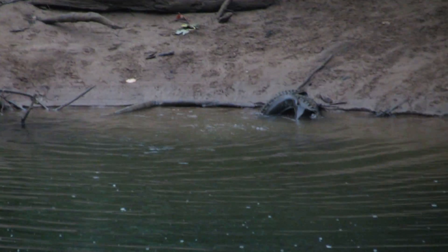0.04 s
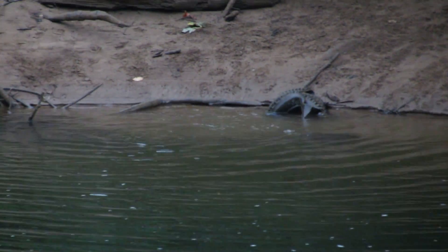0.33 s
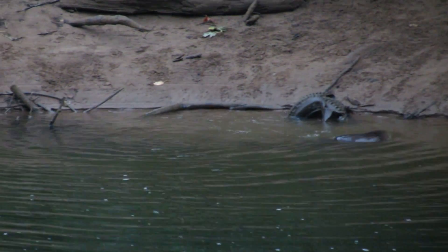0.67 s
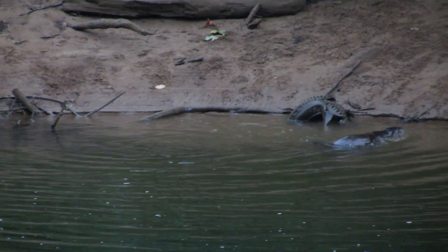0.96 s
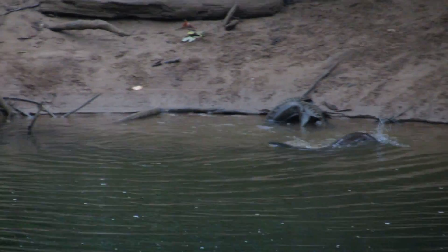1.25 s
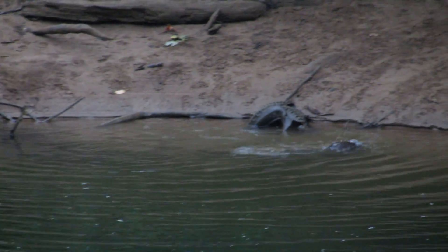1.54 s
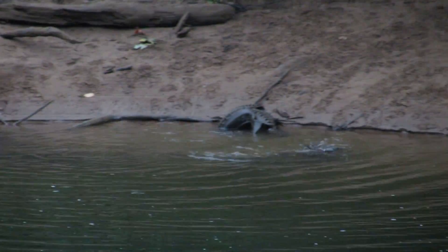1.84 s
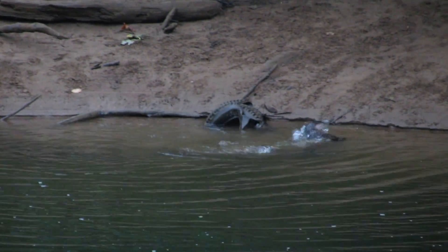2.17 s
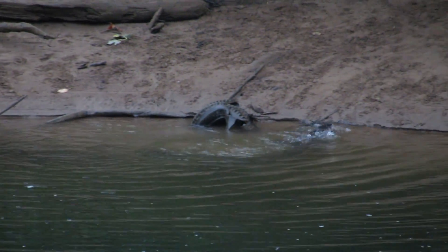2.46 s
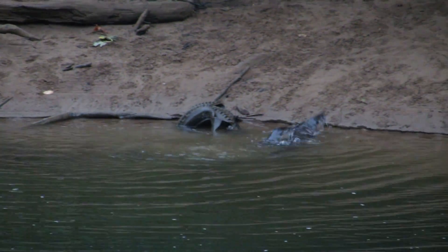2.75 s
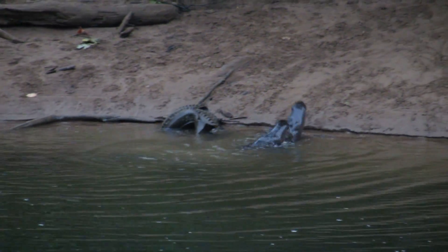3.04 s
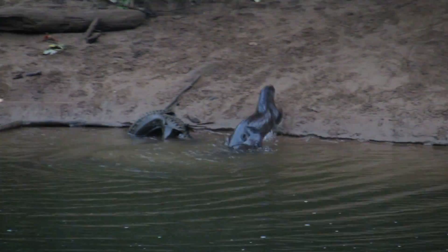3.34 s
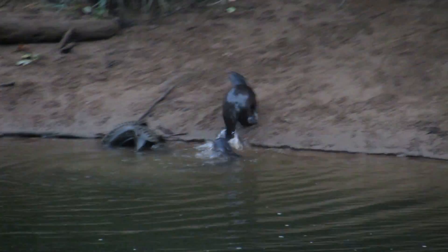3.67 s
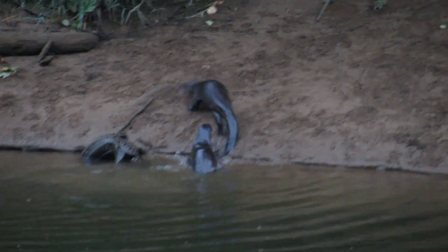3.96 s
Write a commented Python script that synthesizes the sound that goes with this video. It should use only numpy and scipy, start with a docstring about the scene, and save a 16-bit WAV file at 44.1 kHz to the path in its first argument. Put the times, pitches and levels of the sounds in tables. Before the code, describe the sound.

River water rushes steadily throughout, leaning left, over a low rumble and faint hiss. Short, raspy high squeaks come from the right at about 0.3, 1.6 and 2.3 seconds, the loudest at 2.9, just after a sharp tick on the left. A swimming otter splashes faintly near 1.4 and 2.5 seconds, then sloshes softly from 3.2, with a brighter spray near 3.8 as it climbs out.

```python
"""Water rushes steadily off to the left of a quiet river bank, over a low rumble and a faint hiss.
Short high squeaks, each a shaky tone with a rasp, come from the right and echo briefly off the banks.
Across the river an otter swims to the shore and climbs out with a few soft sloshes and splashes.
The rush and sloshes are filtered noise; the splashes are sprays of tiny clicks with a few ringing drops."""
import sys
import numpy as np
from scipy import signal
from scipy.fft import rfft, irfft
from scipy.io import wavfile

SR = 44100
rng = np.random.default_rng(int(sys.argv[2]) if len(sys.argv) > 2 else 0)


def waveform_to_disk(signal):
    """Save audio, clipped to [-1, 1], as 16-bit WAV at the path in sys.argv[1]."""
    frames = np.transpose(np.atleast_2d(signal))
    scaled = np.clip(frames, -1, 1) * 32767
    samples = np.round(scaled).astype(np.int16)
    wavfile.write(sys.argv[1], SR, samples)


N = 176400
T = np.arange(N) / SR
HZ = np.maximum(np.arange(N // 2 + 1) * SR / N, 1)   # the frequencies of a spectrum


def from_db(db):
    """Turn decibels into a gain to multiply by."""
    return 10 ** (np.asarray(db) / 20)


def unit_power(x):
    """Scale a sound to an average power of 1."""
    return x / np.sqrt(np.mean(x ** 2) + 1e-20)


def curves(rows):
    """Join the points of a table into curves over frequency, one for each column after the first."""
    hz, *columns = np.transpose(rows)
    return [np.interp(np.log(HZ), np.log(hz), column) for column in columns]


def pan(db):
    """Gains for the two ears: positive decibels lean left, negative lean right."""
    gains = from_db(np.array([[.5], [-.5]]) * db)
    return gains / np.sqrt(np.mean(gains ** 2, axis=0))


def drift(per_s):
    """A random wander of typical size 1; a higher rate makes it quicker."""
    return unit_power(irfft(rfft(rng.standard_normal(N)) / (1 + (HZ / per_s) ** 2), N))


def noise_pair(likeness):
    """Spectra of white noise for two ears: likeness 1 is alike, 0 unrelated, -1 opposite."""
    shared, opposed = rfft(rng.standard_normal((2, N)))
    alike = np.clip(likeness, -.99, .99)
    return np.sqrt(1 + alike) * shared + np.sqrt(1 - alike) * opposed * np.array([[1], [-1]])


def band(x, hz, octaves):
    """Keep a bell-shaped band of frequencies around hz, at a power of 1."""
    return unit_power(irfft(rfft(x) * np.exp(-.5 * (np.log2(HZ / hz) / octaves) ** 2), N))


def river():
    """Rushing water with a hollow ring, earlier and louder on the left; each octave flickers on its own."""
    # tone of the rush: (frequency [Hz], relative level [dB])
    tone = [(120, -21), (200, -2), (280, -9.5), (400, -4.5), (550, -5), (900, -2), (1300, -0.5),
            (1530, -3.5), (1800, -2), (2200, -7), (3300, -13), (4500, -20), (7000, -29.5), (15000, -52)]
    # hollow resonances: (frequency [Hz], width [Hz], boost [dB])
    hollows = [(269.3, 42, 8.5), (491, 26, 1.5), (633.5, 44, 5.5), (685, 71, 5), (800, 29, 5.5),
               (896, 18, 4.5), (1010, 38, 0.5), (1203, 61, 4.5)]
    # the rush at the two ears: (frequency [Hz], left minus right [dB], likeness [0-1])
    stereo = [(243, 7, 0.46), (454, 1, 0.46), (670, 13.5, 0.73), (930, 4.5, 0.54), (1110, 6, 0.6),
              (2100, 4, 0.37), (3730, 8.5, 0.47), (5500, 5.5, 0), (9000, 3.5, 0.54)]
    # echoes off nearby surfaces, for each ear: (delay [s], gain [ratio])
    left_echoes = [(.0051, -.09), (.00716, -.06)]
    right_echoes = [(.00496, -.1), (.00735, .08), (.01308, -.14)]
    right_lag_s, echo_dull_hz, flicker_db = .00023, 2900, .78
    balance_db, likeness = curves(stereo)
    hollow_db = sum(db / (1 + (2 * (HZ - hz) / width) ** 2) for hz, width, db in hollows)
    rush = noise_pair(likeness) * from_db(curves(tone)[0] + hollow_db) * pan(balance_db)
    rush[1] *= np.exp(-2j * np.pi * HZ * right_lag_s)
    for ear, echoes in enumerate((left_echoes, right_echoes)):
        ripple = sum(gain * np.exp(-2j * np.pi * HZ * delay) for delay, gain in echoes)
        rush[ear] *= 1 + ripple * np.exp(-(HZ / echo_dull_hz) ** 2 / 2)
    octave = np.clip(np.log2(HZ / 200), 0, 6)
    out = np.zeros((2, N))
    for k in range(7):
        one_octave = irfft(rush * np.maximum(1 - abs(octave - k), 0), N)
        out += one_octave * from_db(flicker_db * drift(per_s=27))
    return from_db(-46) * unit_power(out)


def background():
    """A wide, low rumble and a smooth hiss, both shaped noise, with a trace of hum."""
    # tone of each noise: (frequency [Hz], relative level [dB])
    rumble_tone = [(15, -22), (30, -7.5), (48, -5), (60, -2.5), (80, -6), (120, -4.5), (150, -6.5),
                   (220, -7.5), (400, -13), (900, -12.5)]
    hiss_tone = [(1000, -6), (5000, -6), (8000, -10.5), (12000, -14), (16000, -19.5)]
    # steady hum: (frequency [Hz], level [dB])
    hum_tones = [(60, -76.5), (120, -74)]
    lows_only = HZ < rumble_tone[-1][0]
    rumble = irfft(noise_pair(likeness=-.72) * from_db(curves(rumble_tone)[0]) * lows_only, N)
    hiss = irfft(noise_pair(likeness=0) * from_db(curves(hiss_tone)[0]), N)
    hum = sum(from_db(db) * np.sin(2 * np.pi * (hz * T + rng.random())) for hz, db in hum_tones)
    return from_db(-52) * unit_power(rumble) + from_db(-64) * unit_power(hiss) + np.sqrt(2) * hum


def squeaks():
    """Shaky calls of three harmonics through a fixed resonance, each ending in a raspy fall of pitch."""
    # calls: (start [s], rise [s], time until the pitch falls [s], pitch [Hz], base level [dB],
    # roughness [0-1], boost of the lowest harmonic [dB])
    calls = [(0.34, .02, .03, 2900, -56, .5, 0), (1.637, .012, .024, 2600, -51, .3, 7),
             (2.274, .024, .025, 2975, -48, .4, 0), (2.943, .005, .021, 2495, -38.5, .11, 1)]
    # the resonance that colours the harmonics: (frequency [Hz], gain [dB])
    resonance = [(2000, -1), (2500, -12.5), (2650, -3.5), (3000, -12), (4000, -5), (5000, -6),
                 (5300, -10.5), (6000, -6.5), (7500, -17), (8000, -31)]
    settle_s, drop_s, fade_s, release_s = .004, .009, .034, .011
    shake_per_s, shake_db, rasp_db = 300, 5, -9
    out, colour_db = np.zeros(N), curves(resonance)[0]
    for start, rise, hold, hz, db, rough, boost_db in calls:
        t = np.clip(T - start, 0, 1)
        falling_s = np.maximum(t - hold, 0)
        fall = np.tanh(falling_s / drop_s)
        pitch = hz * (1 + .1 * np.exp(-t / settle_s) - .2 * fall)   # starts high, holds, then drops
        rasp = rough + .65 * fall
        shaky_pitch = pitch * (1 + .06 * rasp * drift(shake_per_s))
        phase = 2 * np.pi * np.cumsum(shaky_pitch) / SR
        envelope = np.minimum(t / rise, 1)
        envelope *= np.exp(-np.maximum(t - rise, 0) / fade_s - falling_s / release_s)
        envelope *= from_db(shake_db * rough * drift(shake_per_s))
        hoarse_noise = band(rng.standard_normal(N), hz=4960, octaves=.54)
        out += from_db(db + rasp_db) * envelope * rasp * hoarse_noise
        for k in (1, 2, 3):
            harmonic_db = db + boost_db * (k == 1) + np.interp(k * pitch, HZ, colour_db)
            out += from_db(harmonic_db) * envelope * np.sin(k * phase)
    return out * pan(db=-9)


def bank_echoes(x):
    """A scatter of quickly dying echoes from the banks and trees."""
    delay_s, die_away_s = .0067, .15
    t = T[:SR // 2]
    tail = rng.standard_normal((2, len(t))) * from_db(-60 * t / die_away_s) * (t > delay_s)
    tail /= np.sqrt(np.sum(tail ** 2, axis=1, keepdims=True))
    return from_db(-3.5) * signal.fftconvolve(x.mean(axis=0, keepdims=True), tail, axes=1)[:, :N]


def sloshes():
    """Water pushed aside makes soft, hollow swells of noise."""
    # swells: (peak time [s], half length [s], level [dB], centre frequency [Hz])
    swells = [(1.243, .04, -59, 243), (3.223, 0.029, -49, 1020), (3.31, 0.031, -53, 262),
              (3.757, 0.019, -51.5, 252), (3.778, 0.066, -55.5, 756)]
    out = np.zeros(N)
    for peak, half_length, db, hz in swells:
        envelope = np.exp(-((T - peak) / half_length) ** 2)
        out += from_db(db) * envelope * band(rng.standard_normal(N), hz, octaves=.22)
    return out * pan(db=10)


def splashes():
    """Each splash is a spray of tiny drop clicks that swells and dies away."""
    # sprays: (start [s], rise [s], decay [s], level [dB], centre frequency [Hz], width [octaves])
    sprays = [(1.401, 0.015, 0.042, -62.5, 6660, 0.46), (2.5, 0.088, 0.17, -66, 4800, .55),
              (3.42, .04, .09, -71, 7400, .45), (3.655, .015, .02, -66, 7000, .55),
              (3.808, 0.0018, 0.053, -57, 4380, 0.57), (3.9, 0.21, 0.064, -50.5, 5100, 0.76)]
    drops_per_s, size_spread_db, clump_db = 4600, 19, .5
    out = np.zeros((2, N))
    for start, rise, decay, db, hz, width in sprays:
        signs = rng.choice([-1, 1], (2, N))
        sizes = from_db(size_spread_db * rng.uniform(-1, 1, (2, N)))
        lands = rng.random((2, N)) < drops_per_s / SR
        spray = band(signs * sizes * lands, hz, width)
        envelope = np.clip((T - start) / rise, 0, 1) * np.exp(-np.maximum(T - start - rise, 0) / decay)
        out += from_db(db + clump_db * drift(per_s=120)) * envelope * spray   # drops fall in clumps
    return out * pan(db=2)


def plinks():
    """Larger drops and slaps of water, each ringing for a moment."""
    # drops and slaps: (start [s], level [dB], pitch [Hz], decay [s], left minus right [dB])
    drops = [(1.407, -56, 7300, .0008, 0), (1.687, -47, 5500, .0002, -3), (2.8406, -26, 1000, .0004, 21),
             (3.545, -59, 8000, .003, 0), (3.81, -50, 8250, .0004, 0), (3.818, -49, 4300, .0012, 0)]
    out = np.zeros((2, N))
    for start, db, hz, decay, pan_db in drops:
        t = np.maximum(T - start, 0)
        out += from_db(db) * np.exp(-t / decay) * np.sin(2 * np.pi * hz * t) * pan(pan_db)
    return out


def scene():
    """Squeaks, splashes and their echoes over the river."""
    animal = squeaks() + splashes() + plinks()
    return river() + background() + sloshes() + animal + bank_echoes(animal)


def record(dry):
    """The sound starts abruptly after an instant of silence; the highest treble is cut steeply."""
    start_s, cutoff_hz = .035, 15750
    return irfft(rfft(dry * (T > start_s)) / np.sqrt(1 + (HZ / cutoff_hz) ** 400), N)


dry = scene()
out = record(dry)
waveform_to_disk(out)
```